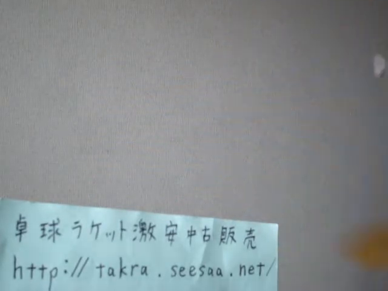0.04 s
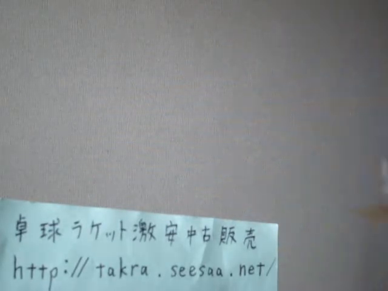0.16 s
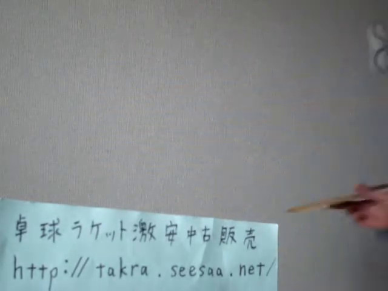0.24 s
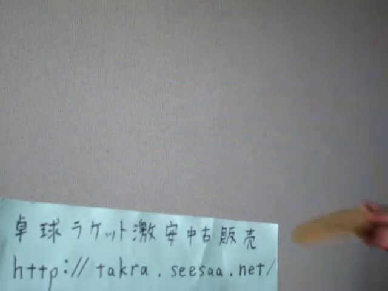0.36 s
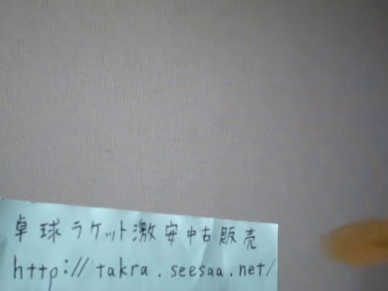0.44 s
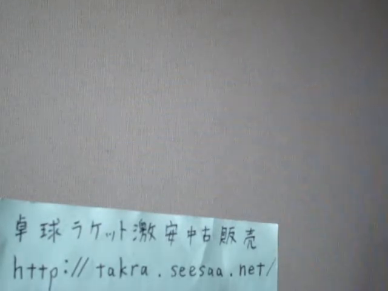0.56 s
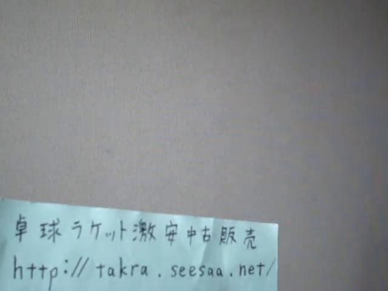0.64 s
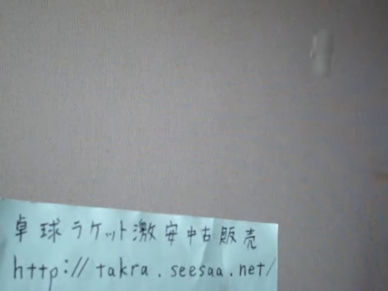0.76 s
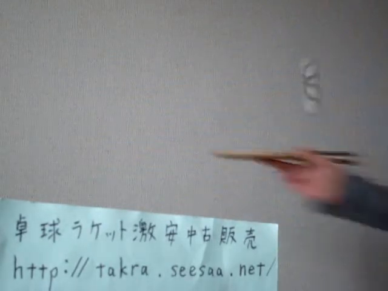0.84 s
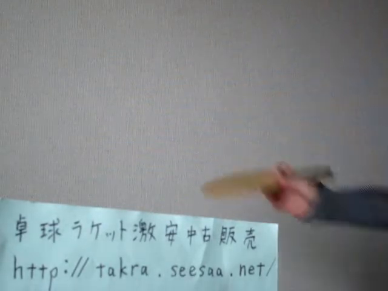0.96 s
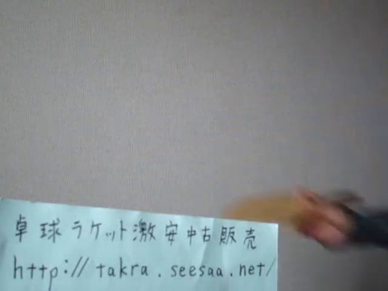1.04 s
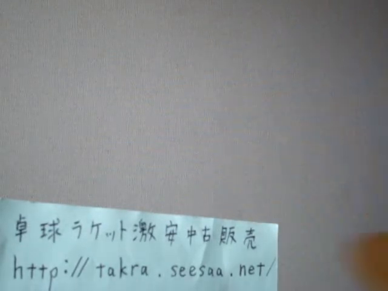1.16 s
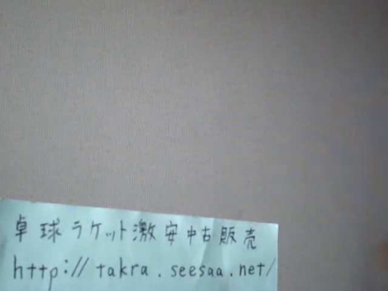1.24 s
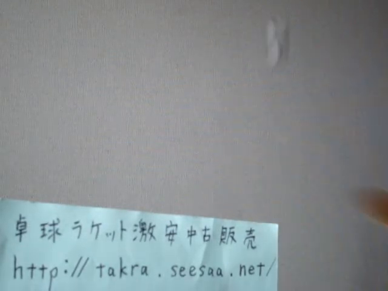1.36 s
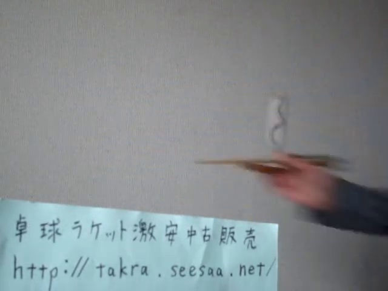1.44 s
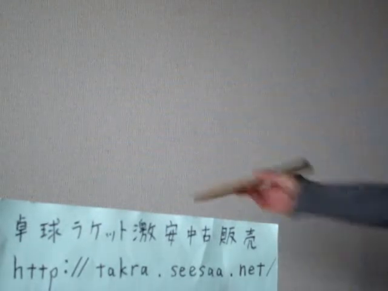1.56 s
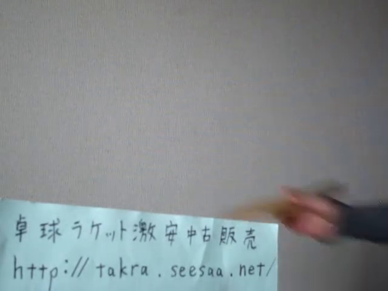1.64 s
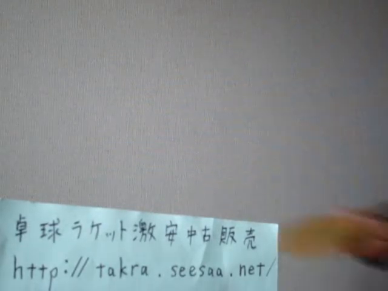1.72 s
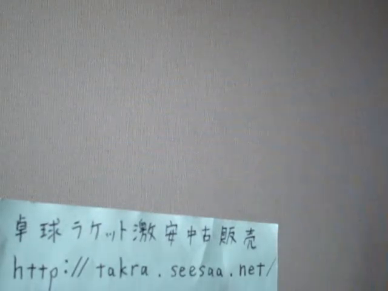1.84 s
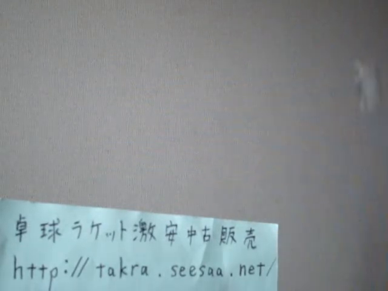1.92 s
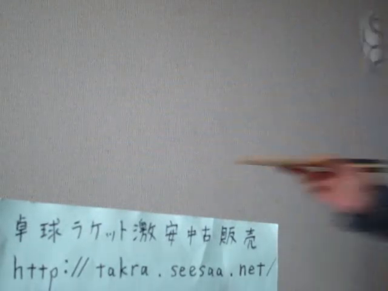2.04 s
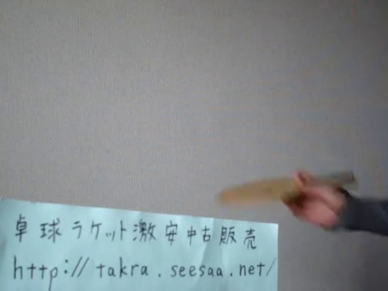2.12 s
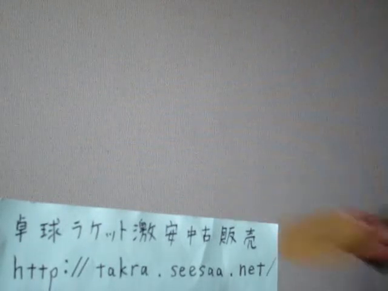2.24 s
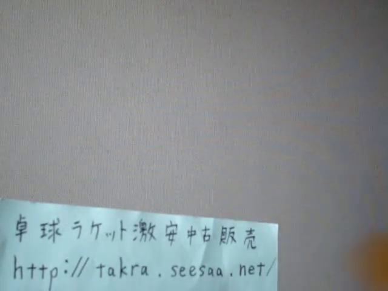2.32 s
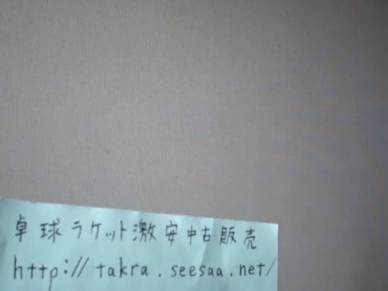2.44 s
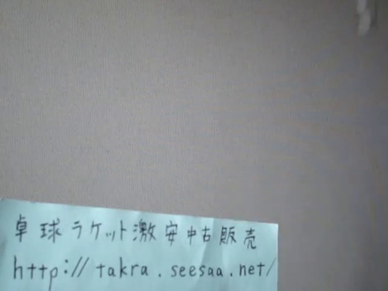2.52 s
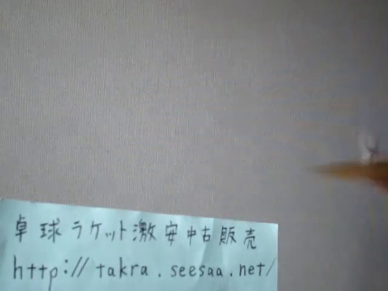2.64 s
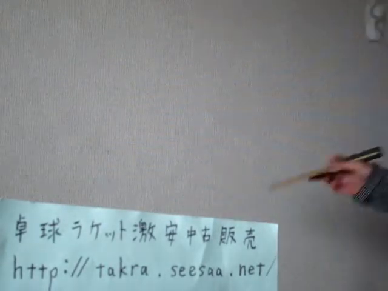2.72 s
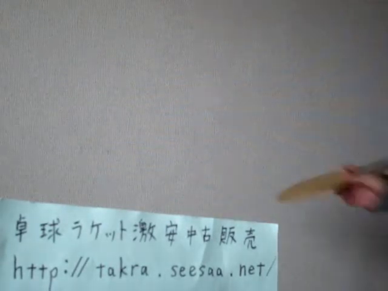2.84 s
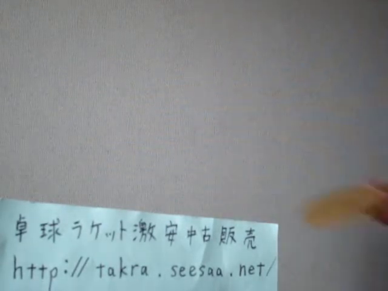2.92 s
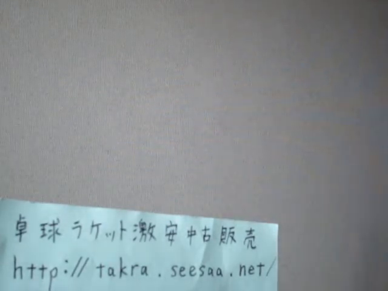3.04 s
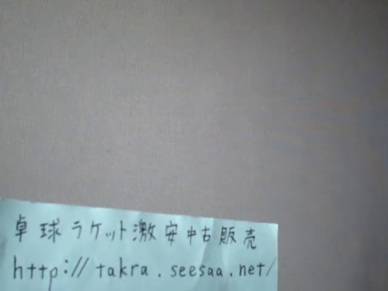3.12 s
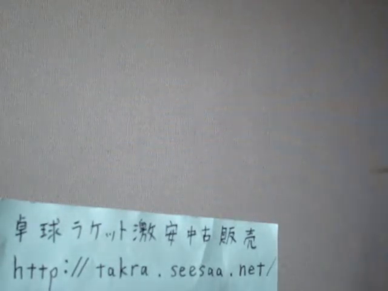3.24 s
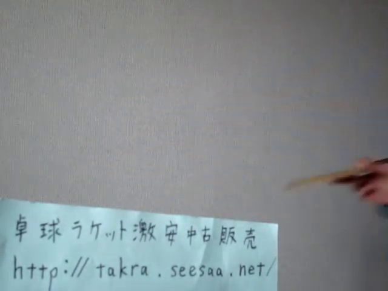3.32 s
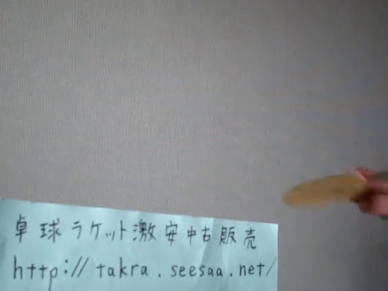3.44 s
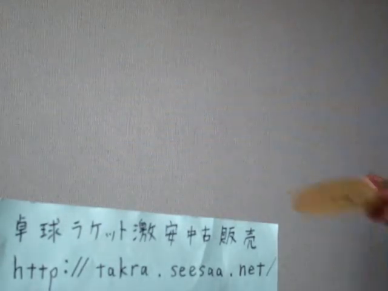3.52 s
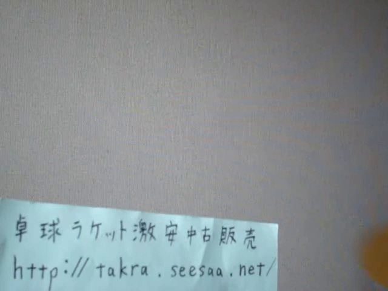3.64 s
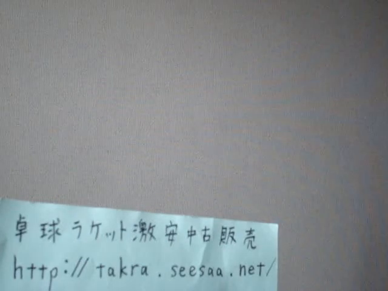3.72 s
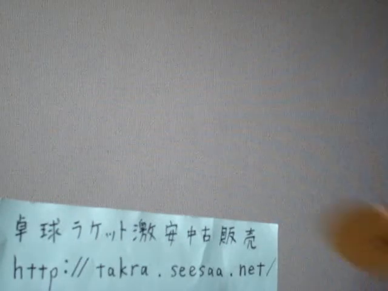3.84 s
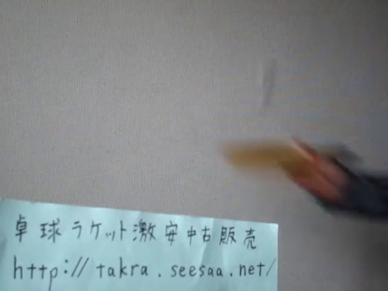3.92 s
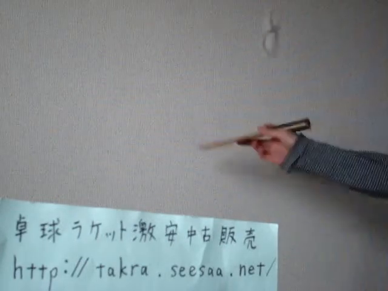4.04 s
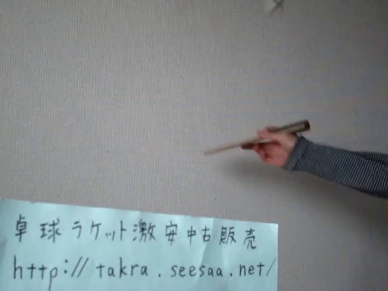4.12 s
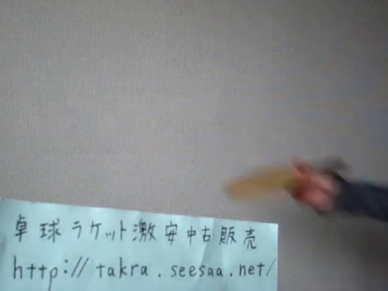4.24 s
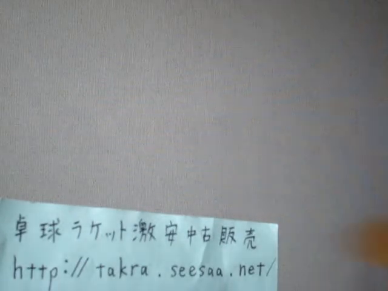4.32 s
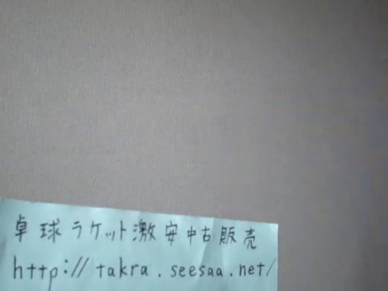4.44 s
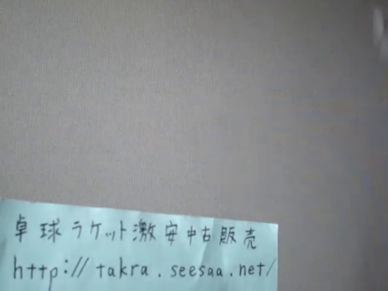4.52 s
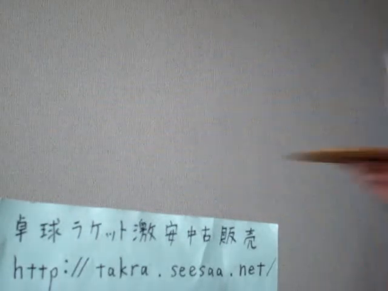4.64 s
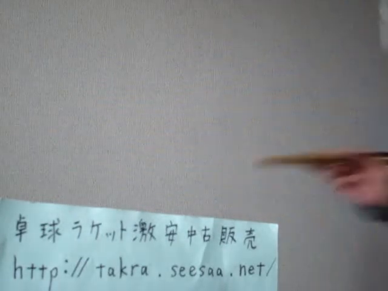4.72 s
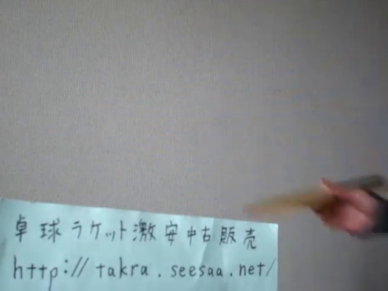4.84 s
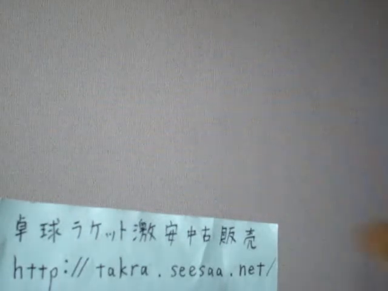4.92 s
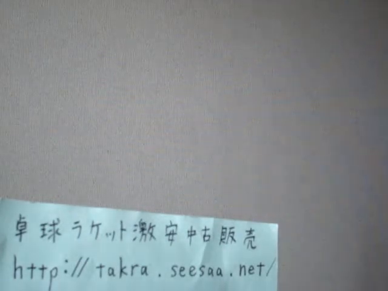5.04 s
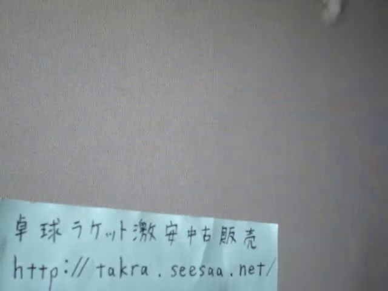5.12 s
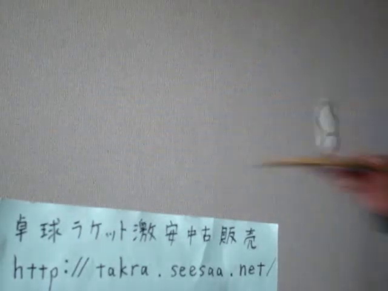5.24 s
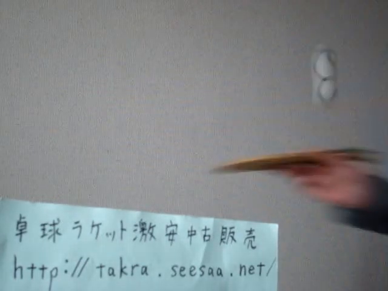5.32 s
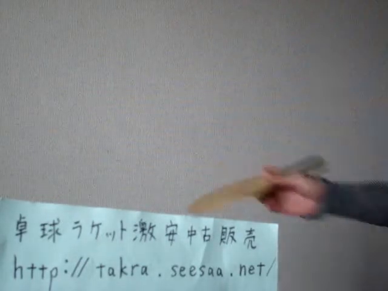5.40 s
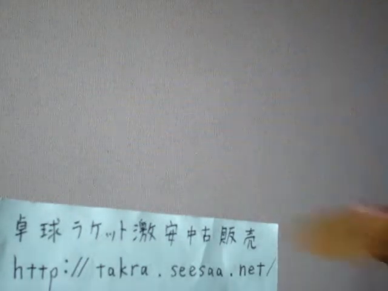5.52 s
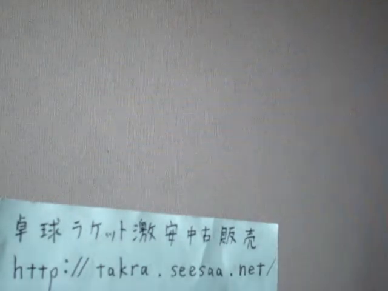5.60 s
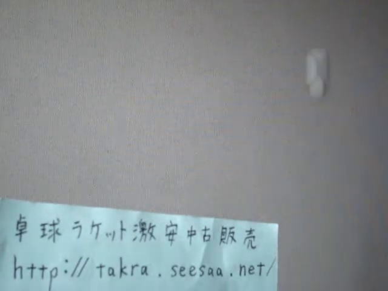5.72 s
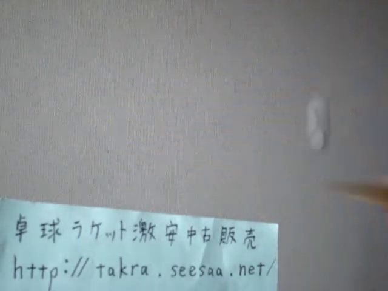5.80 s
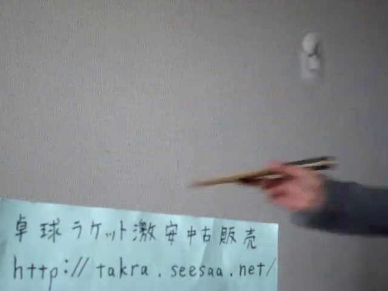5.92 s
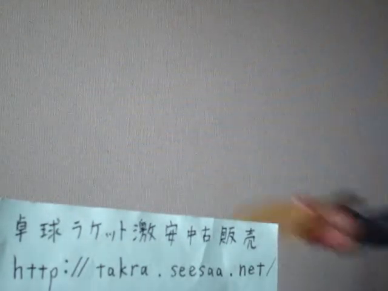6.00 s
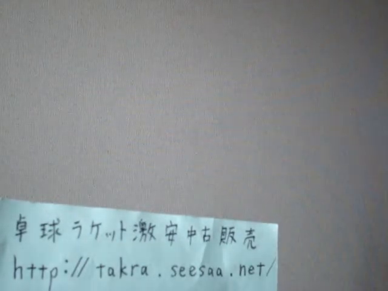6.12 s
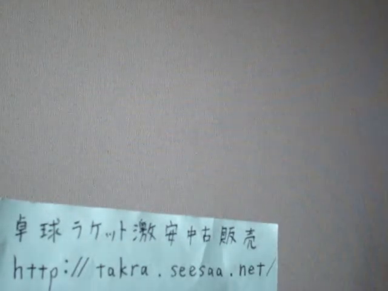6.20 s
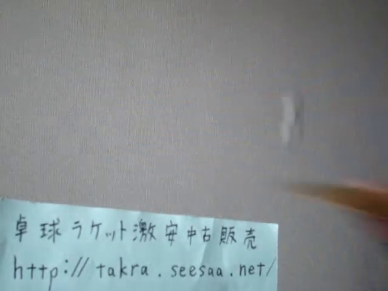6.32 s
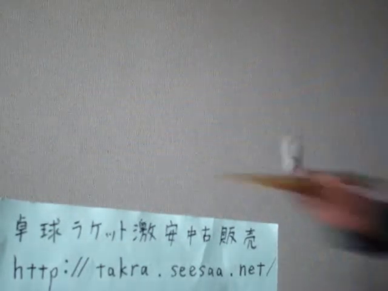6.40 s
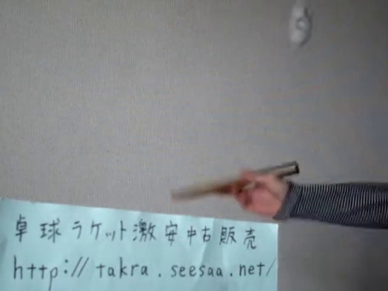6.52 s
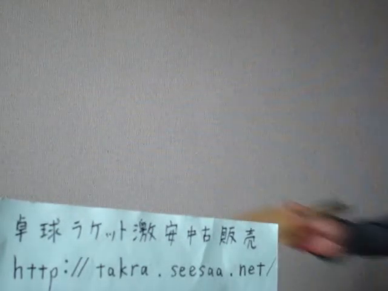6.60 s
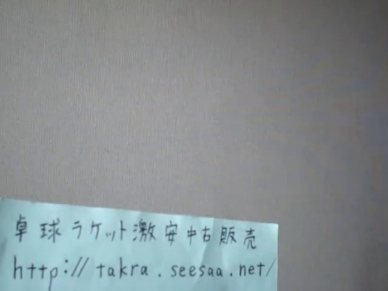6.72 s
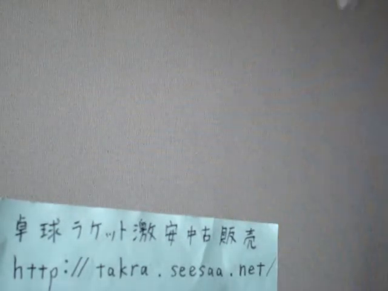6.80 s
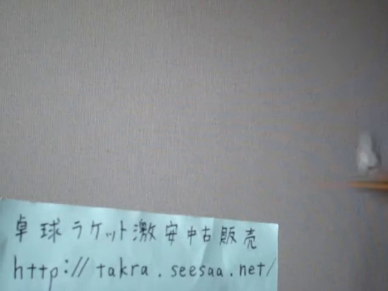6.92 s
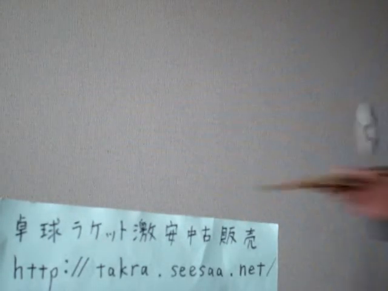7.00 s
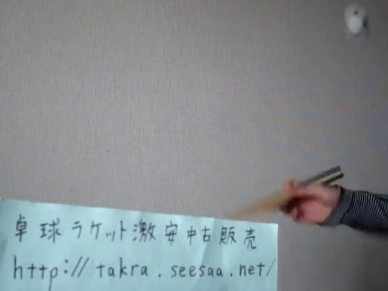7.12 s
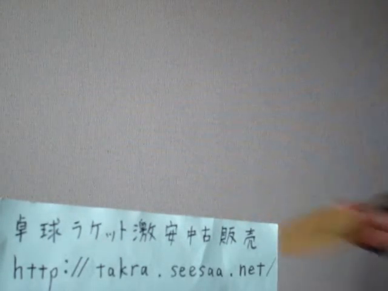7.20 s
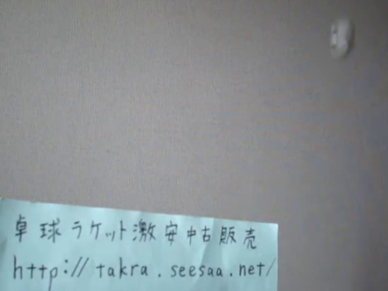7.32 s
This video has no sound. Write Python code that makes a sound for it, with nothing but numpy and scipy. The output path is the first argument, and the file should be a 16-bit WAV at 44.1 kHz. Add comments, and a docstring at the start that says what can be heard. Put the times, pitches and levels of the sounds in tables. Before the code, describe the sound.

Crisp woody clicks of a small hard ball bouncing on a bare bat, about every 0.6 seconds, with a distant engine faintly rising behind.

```python
"""Bouncing ball on a bare blade

In a small room a table-tennis ball bounces on a bare wooden blade: twelve hits, about 0.6 s apart.
Each hit is a contact click plus damped modes of wood and shell; near reflections outweigh the direct sound.
Under it lie shaped noise for microphone hiss and distant road, and one engine slowly gathering speed,
built from multiples of a climbing firing rate."""
import sys
import numpy as np
from scipy import signal
from scipy.fft import rfft, irfft, next_fast_len
from scipy.io import wavfile
from scipy.ndimage import map_coordinates

SR = 44100
rng = np.random.default_rng(int(sys.argv[2]) if len(sys.argv) > 2 else 0)


def to_wav(s):
    """Save 16-bit WAV."""
    ch = np.atleast_2d(s).T  # columns
    pcm = np.round(np.clip(ch, -1, 1) * 32767)  # PCM
    wavfile.write(sys.argv[1], SR, pcm.astype(np.int16))


N = 324576
TIME = np.arange(N) / SR  # s
RING = np.arange(SR // 2) / SR  # time after a hit, s


def amp(db):
    """Decibels to gain."""
    return 10 ** (np.asarray(db) / 20)


def unit(x):
    """x at rms 1."""
    return x / np.sqrt(np.mean(x ** 2) + 1e-20)


def along(points, hz):
    """(frequency [Hz], value) points read on a log frequency axis."""
    f, v = np.transpose(points)
    return np.interp(np.log(hz + 1), np.log(f), v)


def filtered(x, response):
    """x with its spectrum multiplied by a response of frequency; padding keeps the end off the start."""
    size = next_fast_len(len(x) + SR // 2)
    spectrum = rfft(x, size) * response(np.fft.rfftfreq(size, 1 / SR))
    return irfft(spectrum, size)[:len(x)]


def noise(colour):
    """Steady noise of rms 1 with the given colour."""
    white = rng.standard_normal(N)
    return unit(filtered(white, lambda hz: amp(along(colour, hz))))


def wobble(rate):
    """A smooth random curve, rate knots a second."""
    knots = rng.standard_normal(int(N * rate / SR) + 4)
    return map_coordinates(knots, [np.arange(N) * rate / SR])


def road():
    """Distant road noise: steady coloured noise whose level follows the traffic outside."""
    # road noise over time: (time [s], level before the trim below [dB])
    road_level = [(0.0, -58.5), (4.65, -55), (5.84, -51), (6.09, -53.5), (7.36, -53)]
    # colour of the road noise as heard indoors: (frequency [Hz], relative density [dB per Hz])
    street_colour = [(25, -25), (60, -15), (150, -12.5), (250, -3.5), (400, -2.5), (500, 1.5), (650, -3.5),
                     (1000, -0.5), (1400, -2), (2200, -10), (4000, -26), (10000, -72)]
    trim_db = -1.22
    level_db = np.interp(TIME, *np.transpose(road_level))
    return amp(trim_db + level_db) * noise(street_colour)


def engine():
    """A distant engine: multiples of a steadily climbing firing rate, swelling and then dropping away."""
    # engine orders: (multiple of the firing rate [1], relative level [dB])
    orders = [(1, -0.5), (2, -3), (3, -6.5), (4, -5), (7, -4)]
    start_hz, climb_hz_per_s = 36, 6.35  # firing rate
    drone_s, drone_db, approach_db_per_s = 2.35, -74, 10  # faint drone: fully arrived, level, fade-in
    swell_s, swell_db = 5.87, -59  # when it is loudest, and how loud
    rise_db_per_s, fall_db_per_s = 10.5, 46  # it swells slowly and drops away fast

    swell = swell_db - np.maximum(rise_db_per_s * (swell_s - TIME), fall_db_per_s * (TIME - swell_s))
    drone = drone_db - approach_db_per_s * np.maximum(drone_s - TIME, 0)
    level_db = np.maximum(swell, drone)

    phase = 2 * np.pi * np.cumsum(start_hz + climb_hz_per_s * TIME) / SR
    fading_db = -1.5  # each order swells and fades on its way into the house
    notes = 0
    for multiple, db in orders:
        notes = notes + amp(db + fading_db * wobble(3.0)) * np.sin(round(multiple) * phase)
    bass_hz = 65  # the deepest firing notes are barely picked up
    notes = filtered(notes, lambda hz: hz ** 4 / (hz ** 4 + bass_hz ** 4))
    return amp(level_db) * unit(notes)


def hiss():
    """Microphone hiss: a steady bed of coloured noise."""
    # colour of the hiss: (frequency [Hz], relative density [dB per Hz])
    hiss_colour = [(25, -28), (300, 2), (2500, -2), (5000, -4.5), (10000, -8.5)]
    return amp(-57.0) * noise(hiss_colour)


def click(colour, size=2048):
    """Contact click: the shortest causal (minimum-phase) pulse with the given colour."""
    log_gain = np.log(amp(along(colour, np.fft.rfftfreq(size, 1 / SR))))
    cepstrum = irfft(log_gain)
    # folding the cepstrum forward in time makes the pulse causal
    cepstrum[1:size // 2] *= 2
    cepstrum[size // 2 + 1:] = 0
    return irfft(np.exp(rfft(cepstrum)))


def ring(modes, scatter_db, detune):
    """Damped modes; strengths and pitches shift a little with the spot and the grip."""
    hz, db, t60 = np.transpose(modes)[:, :, None]
    strength, shift = rng.standard_normal((2, len(modes), 1))
    decay = amp(db + scatter_db * strength - 60 * RING / t60)
    waves = decay * np.sin(2 * np.pi * hz * (1 + detune * shift) * RING)
    motion = waves[::2].sum(axis=0) - waves[1::2].sum(axis=0)  # neighbours swing in opposite senses
    leak_hz = 700  # below this, air slips round the edge instead of radiating
    return signal.lfilter(*signal.butter(2, leak_hz, "high", fs=SR), motion)


def room(direct_db, walls_db, wander_s):
    """Path from the blade to the microphone: direct sound, near reflections, then a diffuse tail."""
    # first reflections, from the player's body and then the walls: (delay [s], level before walls_db [dB])
    near_echoes = [(.0014, 1.5), (.003, -1), (.0054, 5.5), (.0085, 3), (.0115, -14), (0.016, -1.5),
                   (.021, -3.5)]
    # decay of the diffuse tail: (frequency [Hz], t60 [s])
    tail_decay = [(100, 0.064), (700, 0.21), (1400, 0.2), (4000, 0.22), (10000, 0.2)]
    build_s, hold_s = .007, .017  # echo energy build-up, and the wait before the decay
    hz, t, bins = signal.stft(rng.standard_normal(len(RING)), SR, nperseg=256)
    fade = amp(-60 * np.maximum(t - hold_s, 0) / along(tail_decay, hz)[:, None])
    tail = signal.istft(bins * fade, SR, nperseg=256)[1][:len(RING)]
    tail *= np.sqrt(1 - np.exp(-RING / build_s))
    path = tail / np.linalg.norm(tail)
    path[0] += amp(direct_db)
    for delay, db in near_echoes:
        wandering = abs(delay + wander_s * rng.standard_normal())  # the blade moves from hit to hit
        path[round(wandering * SR)] += amp(db + walls_db)
    return path


def heard(source, path):
    """A vibration carried through the room, at rms 1 over its first tenth of a second."""
    sound = signal.fftconvolve(source, path)[:len(RING)]
    return sound / np.sqrt(np.mean(sound[:SR // 10] ** 2))


def bounces():
    """Every hit clicks, rings blade and ball, and fills the room; where the ball lands sets the balance."""
    # hits: (time [s], strength [dB], distance from the middle of the blade [0-1], brightness [dB])
    hits = [(0.2722, -21.5, 0.42, -5), (0.9243, -22.5, 0.7, -1.5), (1.5392, -22.5, 0.56, -3.5),
            (2.1031, -21, 0.42, -3), (2.7656, -22.5, 0.92, 1.5), (3.3716, -20.5, 0.86, 0),
            (4.0965, -22, 0.97, 5.5), (4.7296, -21, 0.23, -3.5), (5.355, -22, 0.22, -6),
            (5.9265, -21.5, 0.32, 0.5), (6.4979, -23.5, 0.74, -8), (7.0724, -23, 0.24, 6)]
    # blade modes that carry the "tock": (frequency [Hz], relative level [dB], t60 [s])
    tock_modes = [(870, -28, 0.03), (1274, 51, 0.022), (1440, -11.5, 0.0091), (1590, -18, 0.019)]
    # blade modes with a node near the middle: (frequency [Hz], relative level [dB], t60 [s])
    off_centre_modes = [(760, -8, .022), (2368, 0, .046), (3780, -16, .012), (5300, -18, .01)]
    # high blade modes: (frequency [Hz], relative level [dB], t60 [s])
    high_modes = [(3990, 7, 0.043), (4500, -17, .007), (5300, 0.5, 0.0032), (6300, -2, 0.011)]
    # the hollow ball: (frequency [Hz], relative level [dB], t60 [s])
    shell_modes = [(8170, -5.5, 0.0086), (8820, -0.5, 0.015), (9970, -6.5, 0.018)]
    # slow bending, damped by the hand: (frequency [Hz], relative level [dB], t60 [s])
    thud_modes = [(373, -3.5, .05), (473, 28, 0.017), (560, -4, 0.026)]
    # colour of the contact click: (frequency [Hz], relative density [dB per Hz])
    click_colour = [(40, -26), (200, -26), (400, -16), (700, 3), (1100, 16), (1950, 12), (2700, -1),
                    (3300, 0), (4300, -1.5), (6000, -6), (7200, -11), (9300, -7), (10000, -12)]

    rim_tock_loss_db = 4.5  # the main modes weaken from the middle to the rim
    rim_ring_db = -2.5  # the off-centre modes at the rim; they vanish in the middle
    thud_db, rim_thud_gain_db = -33.5, 9  # slow bending in the middle, and its gain at the rim
    click_db, shell_db, high_db = -3.5, -20.5, -30.5  # against the strength
    # dB per dB of brightness: a bright hit rings high and thuds less
    high_per_bright, thud_per_bright = 2.27, -0.58

    out = np.zeros(N + SR)
    contact = click(click_colour)
    for s, strength_db, off_centre, bright_db in hits:
        path = room(direct_db=-20, walls_db=-14.0, wander_s=0.00027)
        tock = amp(-rim_tock_loss_db * off_centre)
        rim = amp(rim_ring_db) * off_centre
        high = amp(high_db + high_per_bright * bright_db)
        shell = amp(shell_db + bright_db)
        thud = amp(thud_db + rim_thud_gain_db * off_centre + thud_per_bright * bright_db)
        parts = [(tock, ring(tock_modes, scatter_db=1.5, detune=.008)),
                 (rim, ring(off_centre_modes, scatter_db=1.5, detune=.003)),
                 (high, ring(high_modes, scatter_db=3, detune=.008)),
                 (shell, ring(shell_modes, scatter_db=2.5, detune=.008)),
                 (thud, ring(thud_modes, scatter_db=2, detune=.015)),
                 (amp(click_db), contact)]
        hit = sum(gain * heard(part, path) for gain, part in parts)
        out[round(s * SR):][:len(RING)] += amp(strength_db) * hit
    return out[:N]


def scene():
    """The bouncing ball over distant traffic and microphone hiss, in one channel."""
    return (road() + engine() + hiss() + bounces())[None]


def record(dry):
    """The recorder's band limit: a very steep low-pass."""
    top_hz = 10050
    return filtered(dry[0], lambda hz: 1 / np.sqrt(1 + (hz / top_hz) ** 300))[None]


dry = scene()
out = record(dry)
to_wav(out)
```